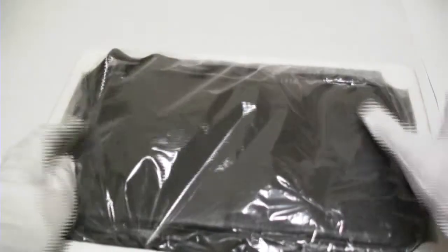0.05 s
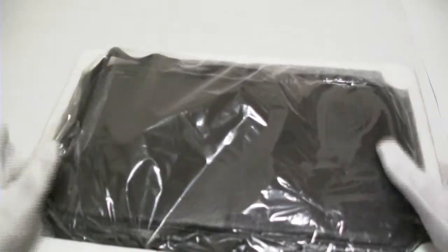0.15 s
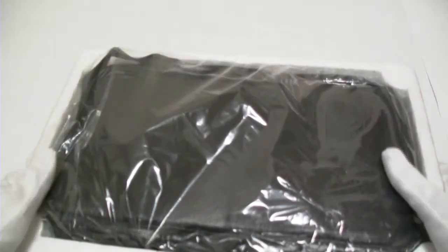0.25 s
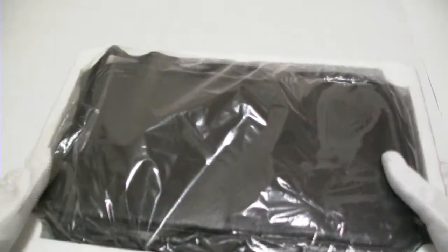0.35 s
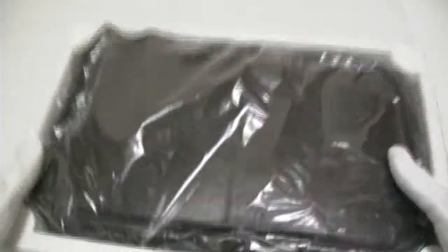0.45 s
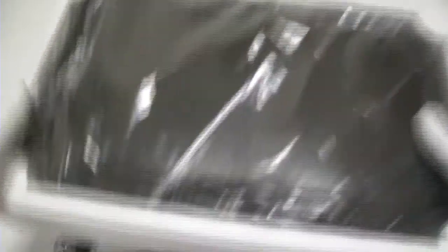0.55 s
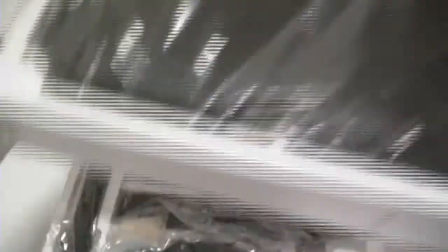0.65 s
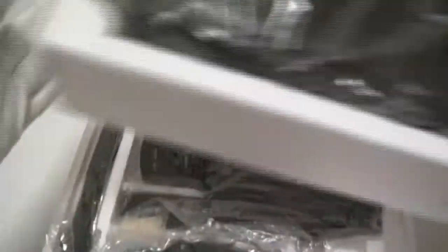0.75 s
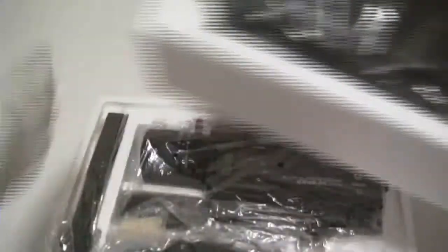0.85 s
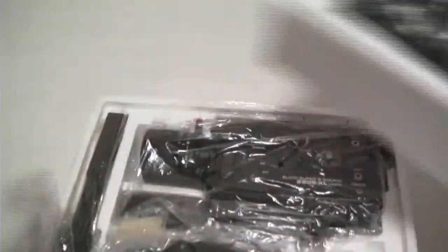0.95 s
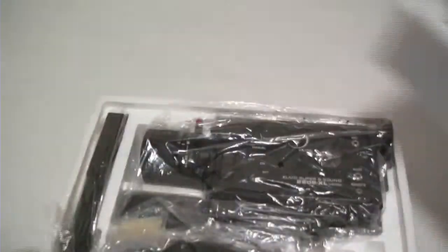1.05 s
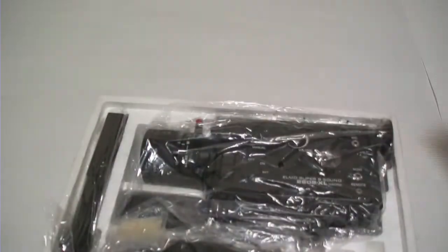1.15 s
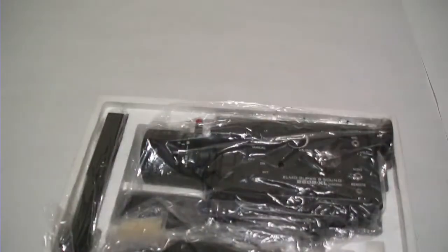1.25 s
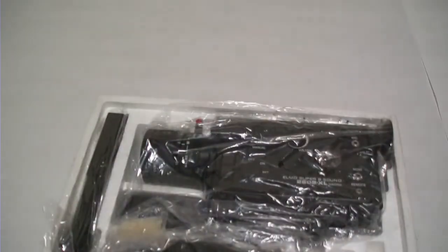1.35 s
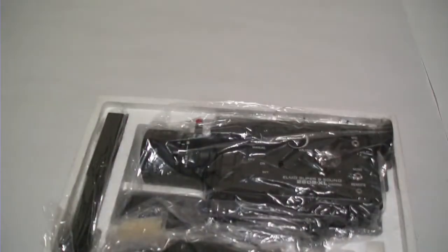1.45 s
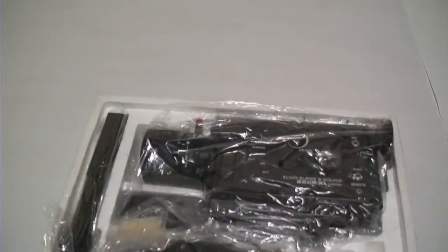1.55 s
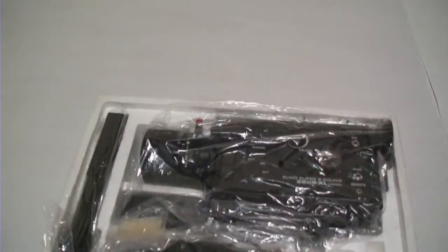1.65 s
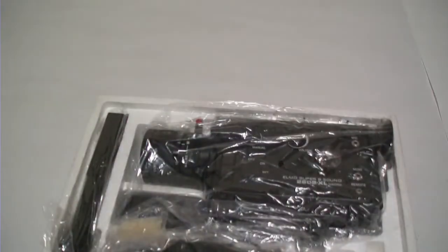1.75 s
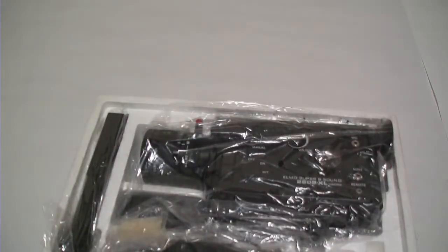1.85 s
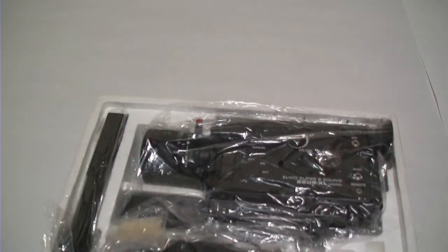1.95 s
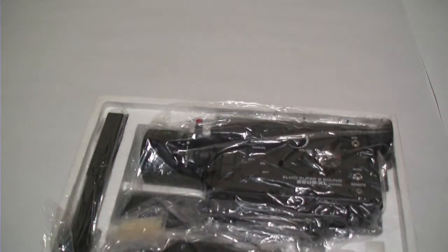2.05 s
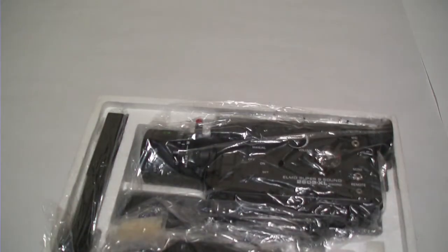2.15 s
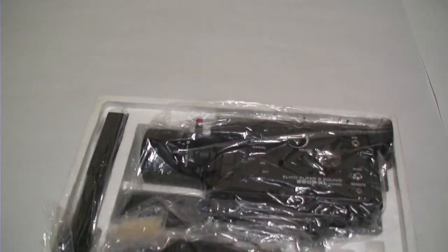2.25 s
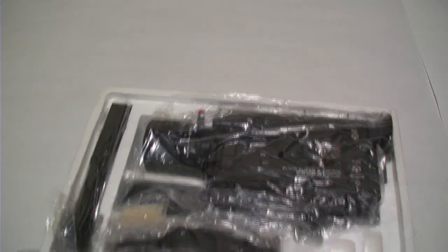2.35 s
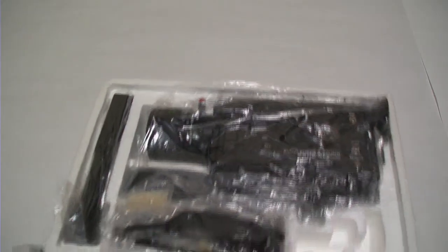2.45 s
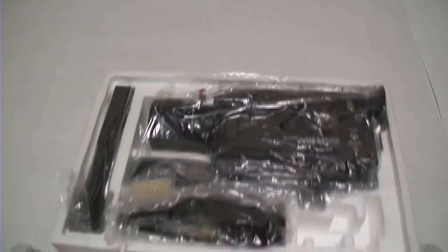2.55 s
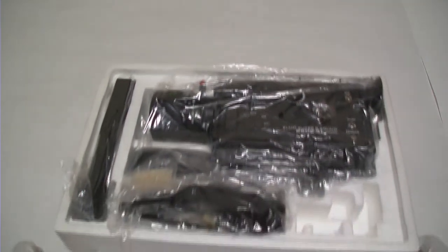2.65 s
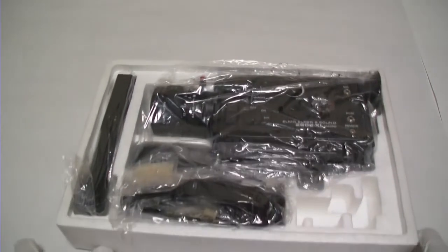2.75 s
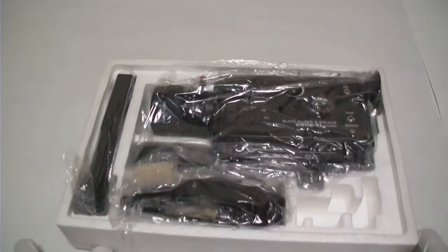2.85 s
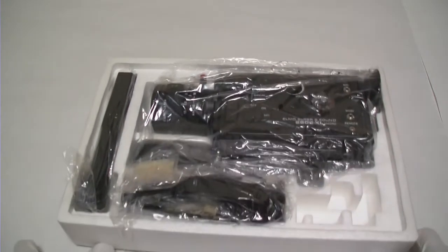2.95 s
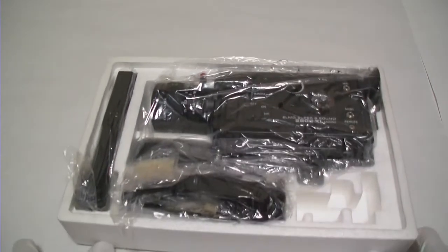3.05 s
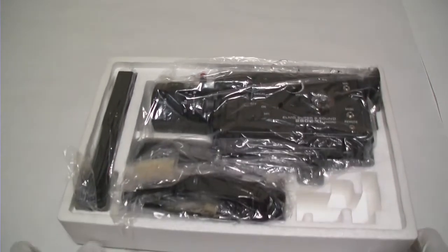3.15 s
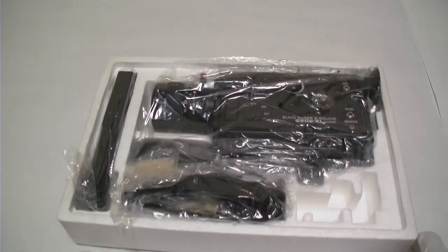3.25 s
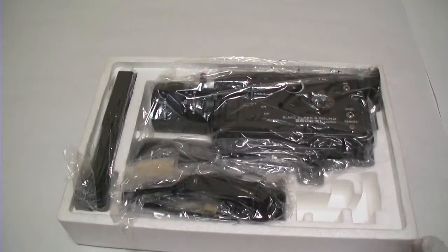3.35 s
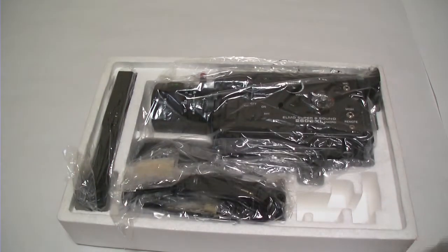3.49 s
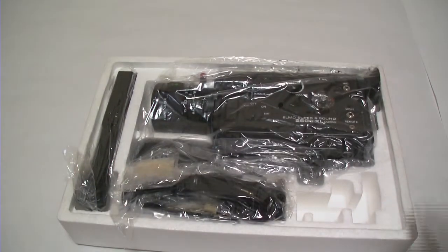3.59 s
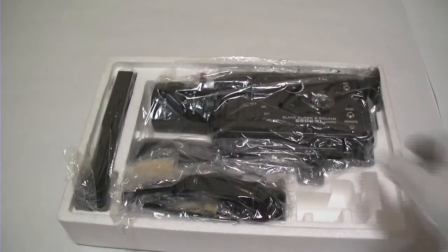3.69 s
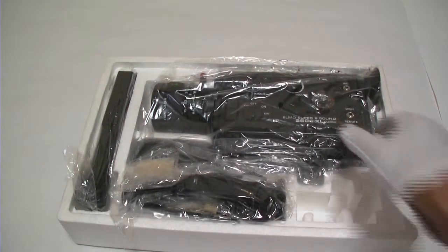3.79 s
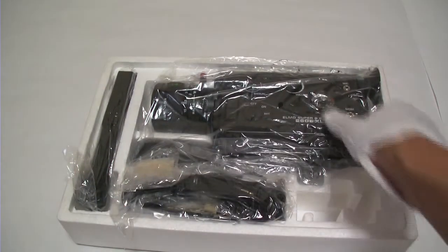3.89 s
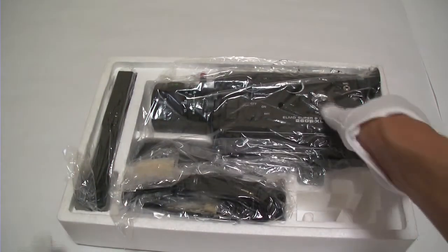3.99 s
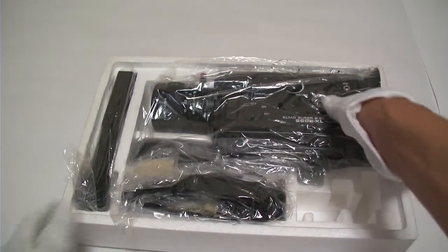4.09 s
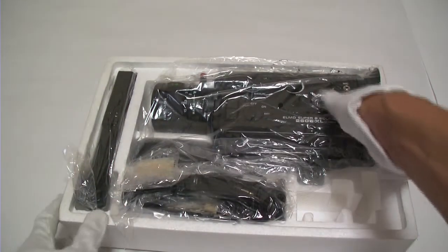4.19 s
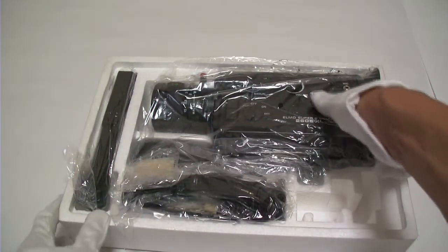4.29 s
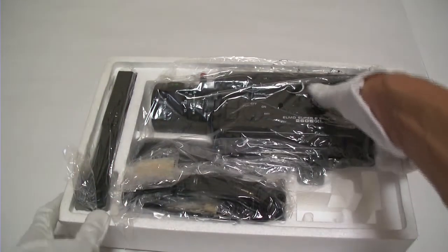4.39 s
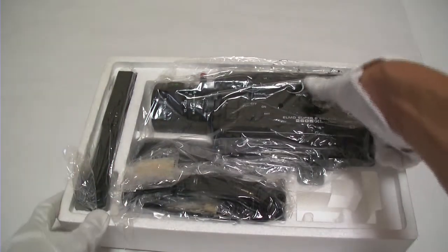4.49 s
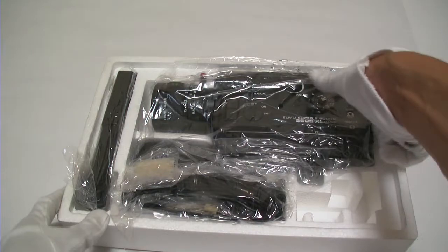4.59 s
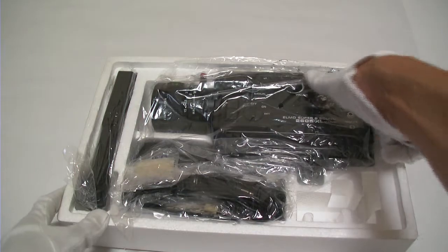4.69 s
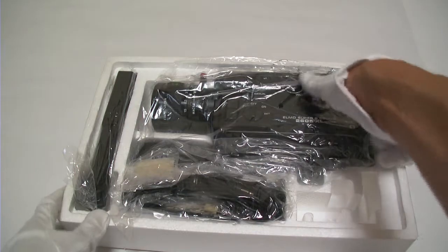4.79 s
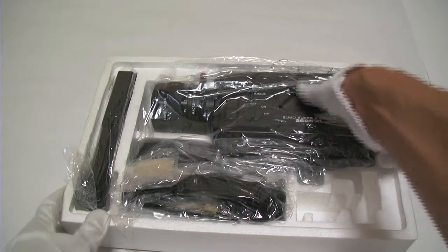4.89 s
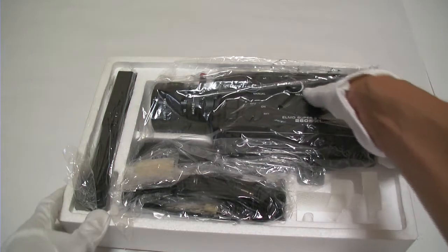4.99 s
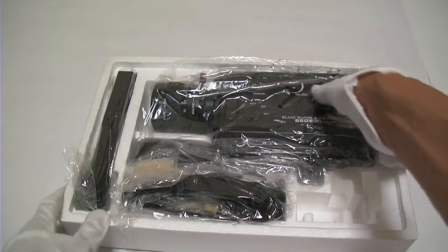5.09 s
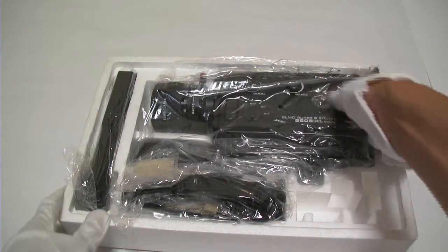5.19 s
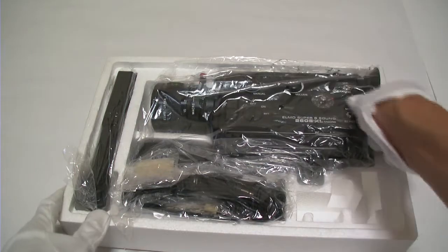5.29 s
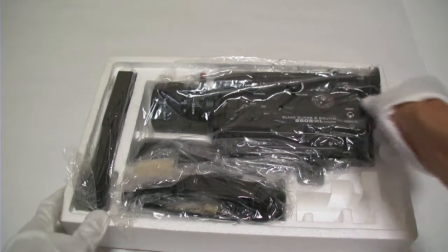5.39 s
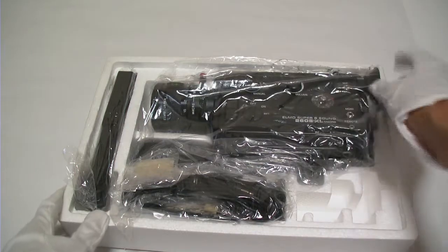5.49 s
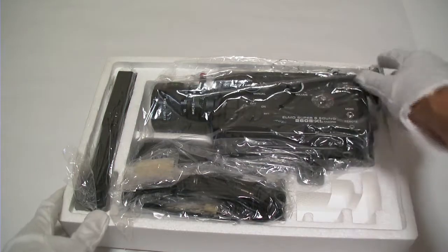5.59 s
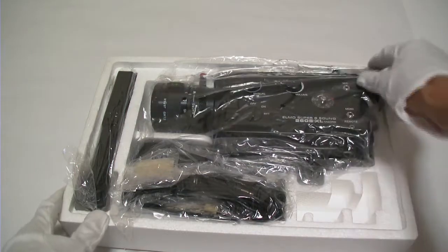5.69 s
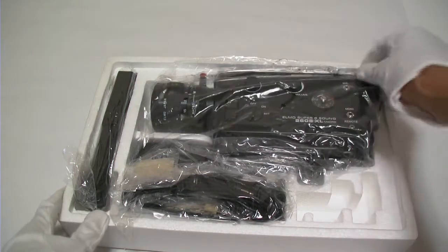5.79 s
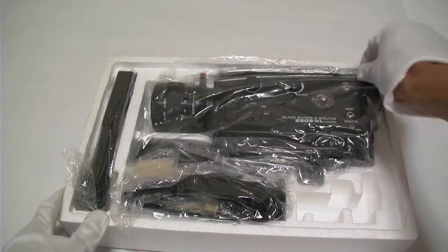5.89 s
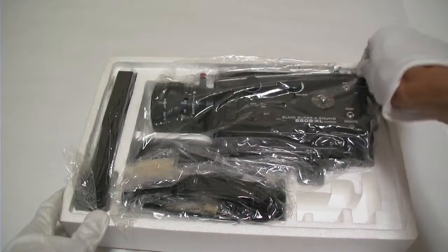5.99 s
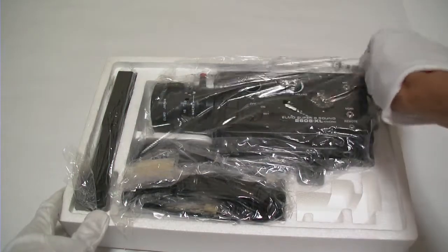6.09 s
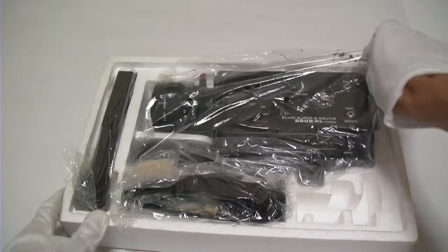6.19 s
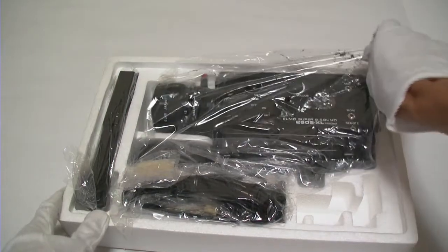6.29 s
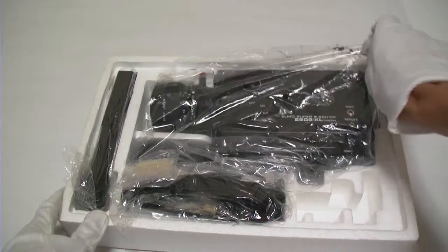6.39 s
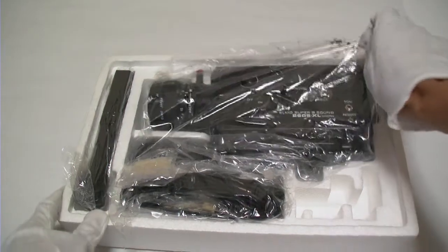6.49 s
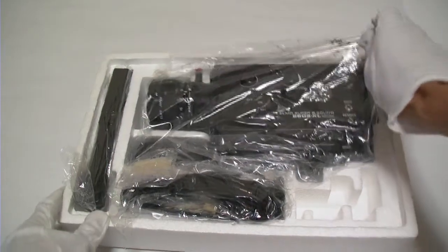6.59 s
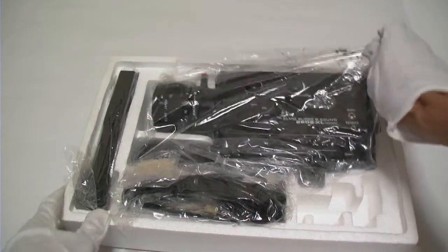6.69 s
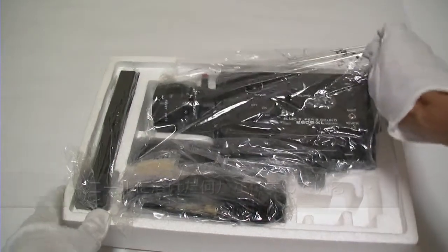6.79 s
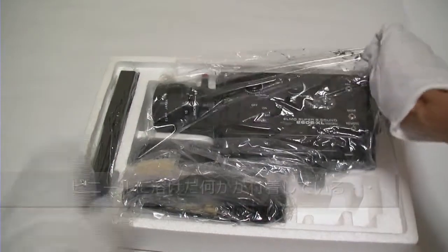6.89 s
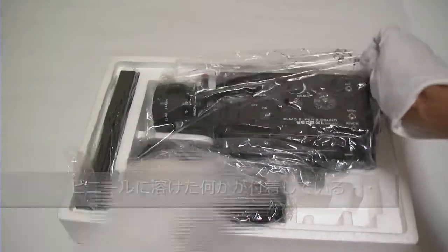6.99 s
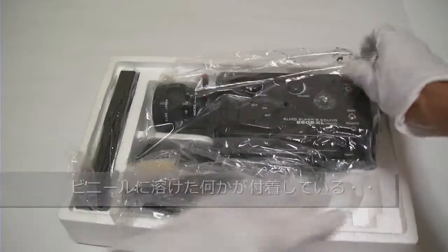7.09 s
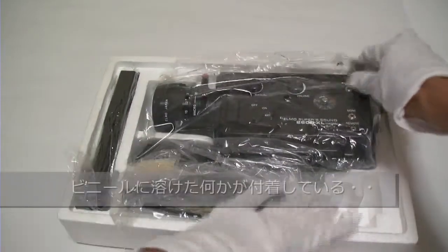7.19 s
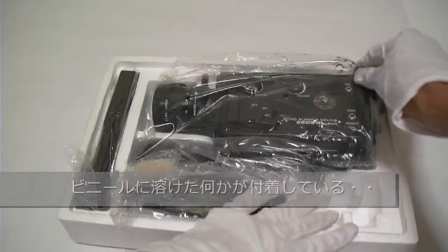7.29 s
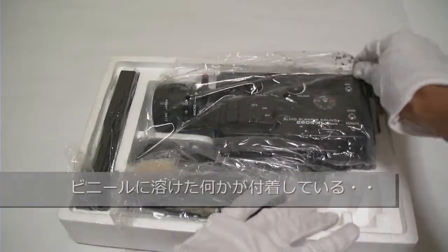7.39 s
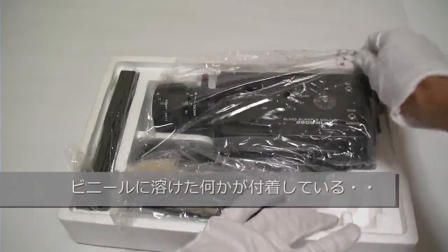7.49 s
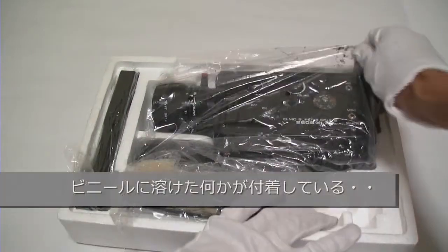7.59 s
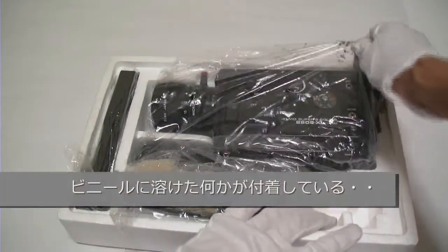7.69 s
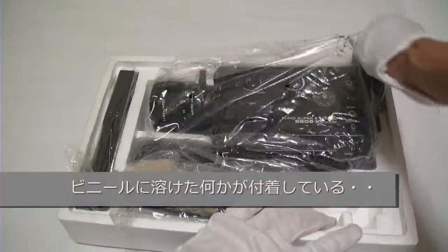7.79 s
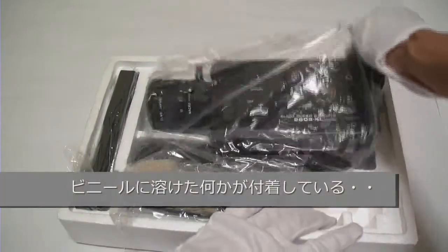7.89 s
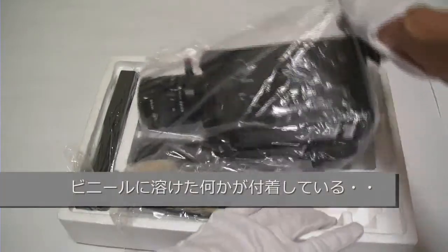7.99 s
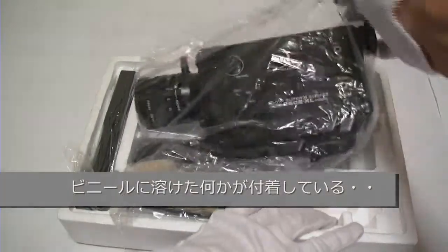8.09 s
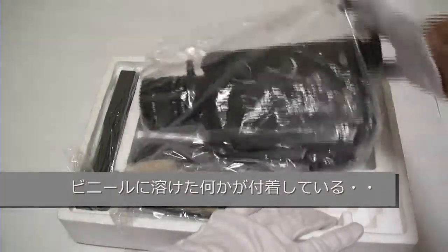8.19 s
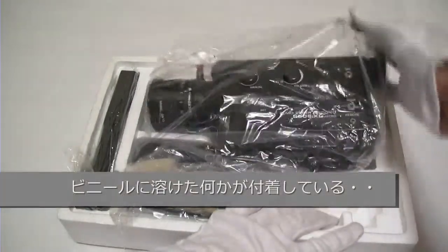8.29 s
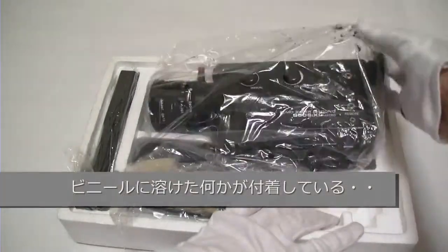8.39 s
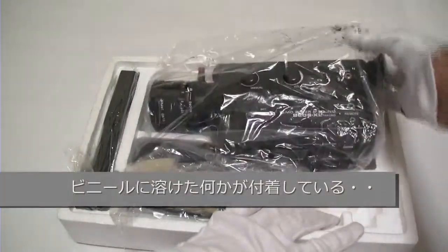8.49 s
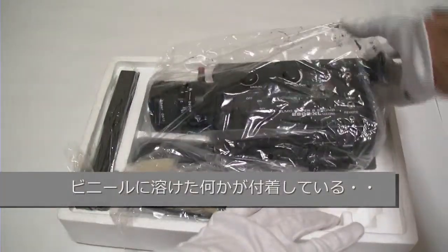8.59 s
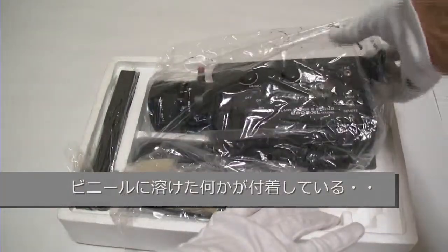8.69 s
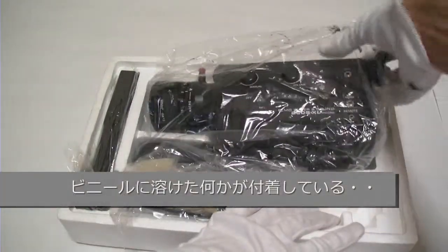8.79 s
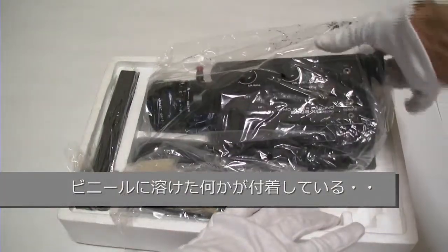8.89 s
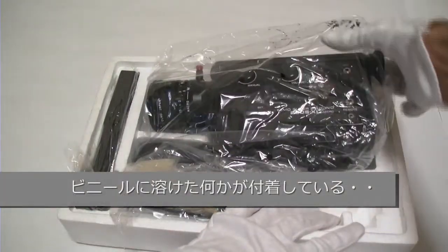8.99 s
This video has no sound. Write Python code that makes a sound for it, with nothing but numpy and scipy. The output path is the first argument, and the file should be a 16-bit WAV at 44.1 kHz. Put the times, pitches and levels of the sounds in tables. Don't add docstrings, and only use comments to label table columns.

```python
import sys
import numpy as np
from scipy import signal
from scipy.fft import rfft, irfft, next_fast_len
from scipy.io import wavfile
from scipy.ndimage import uniform_filter1d, map_coordinates

SR = 44100
rng = np.random.default_rng(int(sys.argv[2]) if len(sys.argv) > 2 else 0)


def put_to_file(sound):
    columns = np.atleast_2d(sound).T
    safe = np.clip(columns, -1, 1)
    whole_steps = np.round(safe * 32767)
    wavfile.write(sys.argv[1], SR, whole_steps.astype(np.int16))


def gain_from_decibels(decibels):
    exponent = np.asarray(decibels, float) / 20
    return 10 ** exponent


N = 399105


def unit(x):
    return x / np.sqrt(np.mean(x ** 2) + 1e-20)


def along(points, hz):
    f, v = np.transpose(points)
    return np.interp(np.log(hz + 1), np.log(f + 1), v)


def curves(rows):
    s, *cols = np.transpose(rows)
    return [np.interp(np.arange(N) / SR, s, c) for c in cols]


def wobble(rate_hz):
    return map_coordinates(rng.standard_normal(int(N * rate_hz / SR) + 4), [np.arange(N) * rate_hz / SR])


def filtered(x, response):
    m = next_fast_len(N + SR // 2)
    return irfft(rfft(x, m) * response(np.fft.rfftfreq(m, 1 / SR)), m)[..., :N]


def placed(seconds, rows):
    at = np.round(np.asarray(seconds) * SR).astype(int)[:, None] + np.arange(rows.shape[1])
    return np.bincount(at.ravel(), rows.ravel(), N + SR)[:N]


def patches(shape, across, along_time):
    field = uniform_filter1d(rng.standard_normal(shape), across, 0)
    return unit(uniform_filter1d(field, along_time, 1))


def resonances(f, modes):
    total = 0
    for k, (centre_hz, width_hz, db) in enumerate(modes):
        damping = 1j * f * width_hz
        total = total + (-1) ** k * gain_from_decibels(db) * damping / (centre_hz * centre_hz - f * f + damping)
    return total


def rustle():
    # t/s, share [0-1]
    crackle_share = [(0, .3), (.62, .25), (.67, .05), (1.5, .1), (2.45, .02), (4.75, .08), (4.8, .3),
                     (5.33, .3), (5.4, .12), (6, .15), (6.1, .7), (6.7, .85), (6.78, .1), (6.97, .1),
                     (7.03, .8), (9.05, .7)]
    # f/Hz, density/dB
    rub_colour = [(400, -34.5), (800, 0), (950, -4), (1250, -1.5), (1650, 2.5), (2900, -2.5), (5900, -1.5),
                  (7500, -2), (9000, -2), (13500, -5.5), (16000, -9)]
    share = np.clip(curves(crackle_share)[0], 0, 1)
    rough = rng.standard_normal(N) * gain_from_decibels(0.92 * wobble(60))
    rub = unit(filtered(rough, lambda hz: gain_from_decibels(along(rub_colour, hz))))
    mix = np.sqrt(share) * crackle() + np.sqrt(1 - share) * rub
    hz, t, z = signal.stft(mix, SR, nperseg=256)
    level_db, bright_db, body_db, fold_hz = handling(t)

    def octaves(centre_hz):
        return np.log2((hz[:, None] + 1) / centre_hz)

    gain_db = (bright_db + 2.5) / (1 + 2 ** (-6 * octaves(7100)))
    gain_db += (body_db + 5.5) / (1 + 2 ** (6 * octaves(2720)))
    gain_db += 2.8 * np.exp(-(octaves(fold_hz) / .2) ** 2)
    gain_db += 2.2 * patches(z.shape, across=2, along_time=16)
    sound = signal.istft(z * gain_from_decibels(gain_db), SR, nperseg=256)[1][:N]
    return gain_from_decibels(np.interp(np.arange(N) / SR, t, level_db)) * unit(sound)


def handling(t):
    # peak t/s, fade/s, level/dB, brightness/dB, foam body/dB
    tray_strokes = [(0, 0.17, -43, -2, -4), (0.062, 0.079, -39, -8, -6), (.21, 0.12, -40, -2, 2),
                    (.28, 0.18, -40, 0, -11.5), (.46, 0.12, -42, -3, -5), (.61, 0.35, -38.5, -6.5, -5.5),
                    (.67, 0.13, -38, 5.5, -8), (0.774, 0.15, -29, -1.5, -16), (.812, 0.063, -29, -6, -10),
                    (.87, 0.087, -47, -13, 8), (1.06, 0.19, -51.5, 2, -9), (1.193, 0.12, -45.5, 4, -2),
                    (1.541, 0.031, -33.5, 9.5, -20), (1.6, 0.35, -48, -4, -8), (1.671, 0.096, -35, -7, -11),
                    (1.78, 0.095, -37, -2, -11), (1.83, 0.11, -35, -12, -2.5), (2.006, 0.055, -44, 2.5, -8),
                    (2.251, 0.1, -41.5, 4.5, -6.5), (3.256, 0.049, -46, -2, 0),
                    (1.33, 0.051, -48.5, -4, -24), (3.42, 0.11, -59.5, 6, -16), (3.6, .05, -56.5, 2, -16)]
    grip_strokes = [(3.935, 0.033, -34.5, 0, -13), (4.0, 0.092, -39, 0.5, -22), (4.12, 0.083, -38, -6, -20),
                    (4.21, 0.043, -36.5, -8, -16), (4.343, 0.046, -30, -3, -13), (4.4, 0.1, -40, -6, -10),
                    (4.7, 0.15, -44, -5, -4), (4.62, 0.17, -43.5, -11, -6), (5.43, 0.14, -38.5, -2.5, -17),
                    (5.62, 0.051, -37.5, 0.5, -14), (5.916, 0.08, -31.5, -6.5, -7.5),
                    (6.78, 0.084, -45, -4, -6), (6.823, 0.056, -38.5, -5, -8), (6.937, 0.049, -41, -1, -9)]
    # peak t/s, fade/s, level/dB
    tug_rows = [(6.15, 0.084, -41), (6.24, 0.2, -38.5), (6.315, 0.15, -35), (7.0, 0.031, -43.5),
                (7.33, 0.11, -37.5), (7.42, 0.19, -39.5), (7.5, 0.17, -38.5), (7.58, 0.14, -36.5),
                (7.86, 0.37, -36), (8.0, 0.13, -42), (8.07, 0.22, -31.5), (8.18, 0.076, -34.5),
                (8.319, 0.11, -38.5), (8.43, 0.35, -35), (8.51, 0.077, -42), (8.628, 0.099, -38),
                (8.76, 0.44, -37.5), (8.87, 0.17, -43)]
    # peak t/s, fade/s, level/dB, brightness/dB, foam body/dB
    slips = [
        (1.516, 0.11, -35, 1.5, -9),
        (2.35, 0.086, -46, 7.5, 5),
        (3.877, 0.14, -36, -2.5, -23),
        (4.275, .1, -43, -3, -12),
        (4.302, 0.048, -30, 1.5, -11),
        (4.529, 0.19, -37, -1.5, -8.5),
        (5.787, 0.12, -31.5, -8, -11),
    ]
    # t/s, level/dB
    drag = [
        (2.37, -54),
        (2.41, -34),
        (2.46, -30),
        (2.67, -32),
        (2.85, -33.5),
        (2.98, -57.5),
        (3.02, -40),
        (3.12, -38.5),
        (3.2, -52),
        (3.24, -69),
    ]
    # t/s, level/dB
    tension = [(1.0, -56), (1.44, -56.5), (2.1, -56.5), (3.3, -56), (3.85, -64), (3.9, -44), (4.86, -56.5),
               (4.92, -53), (5.22, -56), (5.7, -49.5), (6.1, -50), (6.65, -48.5), (6.72, -57),
               (6.89, -54.5), (7.05, -47.5), (7.25, -51.5), (7.6, -45), (9.05, -51)]
    # t/s, f/Hz
    fold = [(0, 6470), (.7, 10000), (.78, 5230), (1.5, 7240), (2.4, 5500), (4.0, 6100), (5.6, 5350),
            (8.3, 5000), (9.05, 3980)]
    tugs = [(*row, -5 - 0.7 * (row[0] - tug_rows[0][0]), -1.5) for row in tug_rows]
    s, fade_s, db, bright_db, body_db = np.transpose(tray_strokes + grip_strokes + tugs + slips)
    fade_s = np.maximum(fade_s, .01)
    is_swell = np.arange(len(s)) < len(s) - len(slips)
    rise_s = np.where(is_swell, 0.65 * fade_s, 0.017)
    late = t - s[:, None]
    fall_db, roundness = 22.5, 1.24
    strokes_db = db[:, None] - fall_db * np.maximum(late / fade_s[:, None], -late / rise_s[:, None]) ** roundness
    drag_db = np.interp(t, *np.transpose(drag), left=-120, right=-120)
    tension_db = np.interp(t, *np.transpose(tension))
    power = gain_from_decibels(2 * np.vstack([strokes_db, drag_db, tension_db]))
    total = power.sum(axis=0)
    bright = np.append(bright_db, [-1.5, -6.5]) @ power / total
    body = np.append(body_db, [-6.5, -3]) @ power / total
    return 10 * np.log10(total), bright, body, np.interp(t, *np.transpose(fold))


def crackle():
    # f/Hz, density/dB
    film_colour = [(500, -30), (900, 5), (1800, -3), (2900, -12.5), (4900, -4.5), (7400, -5.5), (10600, 1),
                   (16000, 1.5)]
    draw = rng.random((4200, 4))
    seconds = draw[:, 0] * N / SR
    clump_db = 2 * wobble(40)[(seconds * SR).astype(int)]
    size = gain_from_decibels(np.minimum(-5 * np.log(draw[:, 1]), 8.5) + clump_db)
    rows = buckles(2500 * 3.8 ** draw[:, 2], np.full(len(draw), -10.), .0015 + .002 * draw[:, 3], width=.6)
    film = filtered(placed(seconds, rows * size[:, None]), lambda hz: gain_from_decibels(along(film_colour, hz)))
    return film / np.sqrt(np.abs(uniform_filter1d(film ** 2, size=SR // 16)) + 1e-9)


def buckles(hz, top_db, t60_s, width):
    t, f = np.arange(384) / SR, np.fft.rfftfreq(384, 1 / SR) + 1
    late = np.maximum(t - .001, 0)
    envelope = gain_from_decibels(-60 * late / t60_s[:, None]) * (1 - np.exp(-late / .00012))
    burst = rng.standard_normal((len(hz), 384)) * envelope
    bump = np.exp(-(np.log(f / hz[:, None]) / width) ** 2)
    skirt = gain_from_decibels(top_db)[:, None] / (1 + (2500 / f) ** 4) / (1 + (f / 13000) ** 2)
    rows = irfft(rfft(burst) * (bump + skirt), 384)
    return rows / np.abs(rows).max(axis=1, keepdims=True)


def snaps():
    # t/s, peak level/dB, centre f/Hz, skirt level/dB
    snap_rows = [(0.0414, -18, 8400.0, 12), (0.1208, -24.5, 5300.0, -10), (0.2049, -17, 8100.0, -5),
                 (0.225, -17.5, 8300.0, -2), (0.2703, -18, 10300.0, -6), (0.56, -17.5, 3230, -17),
                 (0.577, -18, 7200.0, -1), (0.6126, -11.5, 5700.0, 7), (0.8843, -16.5, 10400, 19),
                 (1.0063, -28.5, 8300, -2), (1.819, -18, 3300, -18), (2.1394, -22.5, 5500, -16),
                 (2.993, -30, 5000, -11),
                 (4.058, -20, 6400, -13), (4.0659, -17, 8400, -6), (4.24, -22.5, 8300, 1),
                  (4.3053, -20, 4200, -14), (4.443, -25, 6300, 8), (4.895, -23, 11900, -2),
                  (4.921, -24, 8750, -3), (4.951, -28.5, 5500.0, -21), (5.053, -26, 14100.0, -5),
                  (5.1169, -28, 10100, -12), (5.266, -28.5, 9000.0, -5), (5.311, -26.5, 10300.0, -7),
                  (5.3483, -29, 14900, -17), (5.476, -18.5, 4550, 5), (5.4953, -18.5, 10800, -13),
                  (5.7813, -20.5, 10500, -18), (5.898, -19, 4180, -21),
                 (6.1081, -27, 6000.0, -14), (6.143, -18.5, 4500.0, -10), (6.201, -14.5, 11400.0, 4),
                     (6.2246, -24, 6400.0, -8.0), (6.26, -16.5, 11000.0, -7), (6.277, -18, 5500.0, -6),
                     (6.4419, -18.5, 4300.0, -5), (6.526, -30, 2690, -31), (6.6275, -26.5, 10500.0, 7),
                     (6.664, -24, 11700.0, 19), (7.0227, -26.5, 4800.0, -18), (7.07, -20, 5740, -16),
                     (7.0986, -18, 4020, -9), (7.1427, -20, 5900.0, 0), (7.181, -20, 6000, -10),
                     (7.271, -29.0, 4800.0, -3), (7.309, -24, 7100.0, 0), (7.3247, -23.5, 5900.0, -11),
                     (7.3436, -20, 11400.0, -5), (7.4673, -20, 5300.0, -15),
                 (7.557, -18, 8000, -20), (7.5682, -15, 6300, -12), (7.5824, -12.5, 5340, -6),
                  (7.621, -17.5, 4700.0, -13.0), (7.636, -16.5, 4100, -25), (7.67, -25.5, 6500.0, -22),
                  (7.831, -18, 5760, 4), (7.8507, -14.5, 3120, -10), (8.022, -14, 6000.0, -2),
                  (8.049, -17, 9900, -3), (8.0918, -20, 4500.0, -25), (8.1228, -24, 7400.0, -11),
                  (8.1544, -11, 5000, -9), (8.1998, -21, 4650, 0), (8.31, -16, 6460, -20),
                  (8.388, -18.5, 4670, -14.0), (8.464, -18, 5030, 15), (8.5043, -16.5, 9350, 5),
                  (8.5173, -21, 4570, -10), (8.648, -18, 3830, -15), (8.663, -19, 9200, -13),
                  (8.7584, -19, 6300, -11.0), (8.818, -19, 6400.0, -9), (8.8522, -8.5, 4200, -15),
                  (8.8927, -16, 4400, -4), (9.008, -16, 4750, -16)]
    # t/s, peak level/dB, centre f/Hz
    pops = [(0.341, -23.5, 1500), (.5965, -31, 2600), (1.825, -28, 770), (5.929, -26, 1530),
            (7.337, -26, 1380), (7.568, -21, 1270), (7.583, -26, 2060), (7.67, -24, 1730),
            (7.851, -22, 1320), (8.083, -23, 1540), (8.153, -26, 2030), (8.754, -29, 920),
            (8.853, -26.5, 1000), (8.946, -27, 1410), (9.006, -25, 1980), (1.527, -28, 580),
            (7.0985, -29, 1420), (.344, -29, 1000)]
    s, db, hz, top_db = np.transpose(snap_rows)
    t60_s = .0042 * gain_from_decibels(.2 * (db + 22))
    direct = placed(s - .001, gain_from_decibels(db - 1.35)[:, None] * buckles(hz, top_db + 8.5, t60_s, width=0.28))
    s, db, hz = np.transpose(pops)
    direct += placed(s - .001, gain_from_decibels(db - 0.4)[:, None] * buckles(hz, db * 0 - 28.0, 14 / hz, width=0.61))
    direct += ticks()
    first_echo = gain_from_decibels(-13.0) * np.roll(direct, round(.0023 * SR))
    second_echo = gain_from_decibels(-11) * np.roll(direct, round(.0041 * SR))
    return direct + first_echo + second_echo


def ticks():
    # t/s, peak level/dB, centre f/Hz
    tick_rows = [(0.0169, -25, 6400), (0.0315, -26, 6400), (0.0557, -24, 8700), (0.0656, -21, 7300),
                 (0.0815, -29, 7000), (0.1711, -24, 8000), (0.24, -15, 8600), (0.339, -19, 6800),
                 (0.975, -41, 5200), (1.149, -31, 7100), (1.1613, -42, 5000), (1.4693, -33, 5300),
                 (2.1024, -40, 8200), (2.9698, -39, 5900), (3.1924, -34, 4800), (4.0703, -27, 7400),
                 (4.1274, -21, 6000), (4.1423, -25, 7100), (4.1632, -35, 6200), (4.4774, -38, 5000),
                 (4.8148, -33, 6600), (4.8371, -35, 6900), (4.9606, -35, 5500), (5.0164, -33, 5800),
                 (5.032, -24.5, 7600), (5.062, -27, 7000), (5.0751, -32, 8800), (5.3174, -30, 7200),
                 (5.3602, -37, 5600), (5.4267, -22, 8400), (5.5195, -21, 8300), (5.575, -33, 5400),
                 (5.59, -38, 3970), (5.8262, -21, 9400), (5.8768, -23, 6300), (6.0102, -30, 5100),
                 (6.0394, -27, 5200), (6.0951, -41, 4400), (6.1141, -30, 8500), (6.1322, -24, 4900),
                 (6.1574, -26, 6300), (6.1693, -26, 6400), (6.18, -22, 6700), (6.187, -18, 5100),
                 (6.2071, -22, 5300), (6.2146, -22, 5100), (6.2368, -27, 7700), (6.2409, -19, 6400),
                 (6.2699, -20, 9000), (6.2818, -22, 7900), (6.2879, -23, 7300), (6.294, -19, 6600),
                 (6.3027, -18, 5800), (6.321, -23, 7900), (6.3305, -25, 5900),
                 (6.3629, -31, 7200), (6.3985, -24, 7800), (6.4246, -34, 6800), (6.4712, -34, 3900),
                     (6.4794, -37, 4600), (6.4913, -35, 4900), (6.4975, -34, 5900), (6.5033, -33, 5300),
                     (6.5121, -35, 4900), (6.5727, -31, 4000), (6.5774, -32, 5400), (6.591, -32, 7300),
                     (6.5969, -30, 4600), (6.6073, -33, 5400), (6.6127, -35, 4400), (6.6799, -33, 5600),
                     (6.687, -35, 4600), (6.6994, -26, 5900), (6.7511, -36, 6400), (6.9739, -39, 3500),
                     (6.9849, -37, 3800), (7.0397, -34, 5900), (7.0485, -35, 6400), (7.0846, -30, 4700),
                     (7.1024, -29, 4500), (7.1181, -32, 6100), (7.1223, -33, 3900), (7.1513, -29, 5200),
                     (7.1848, -32, 6000), (7.1966, -35, 7300), (7.2192, -30, 6800), (7.2867, -25, 7400),
                     (7.2933, -32, 4100), (7.3307, -22, 8200), (7.3621, -23, 7100), (7.3658, -31, 6500),
                     (7.3885, -31, 4900), (7.4076, -25, 5400), (7.4317, -27, 5300), (7.441, -33, 6500),
                     (7.4511, -27, 7200), (7.5376, -23, 7900), (7.5406, -28, 5200), (7.5963, -21, 7800),
                     (7.6402, -21, 5100), (7.7052, -27, 9300), (7.7125, -25, 7400), (7.7467, -29, 5800),
                 (7.7607, -23, 7100), (7.8221, -18, 6200), (7.9211, -31, 5300), (7.9302, -25, 4500),
                  (7.9713, -24, 5600), (7.979, -20, 6200), (7.9926, -20, 7500), (8.0065, -22, 6000),
                  (8.0294, -16, 8000), (8.059, -19, 5200), (8.069, -20, 7200), (8.1088, -23, 5800),
                  (8.1482, -21, 4370), (8.1588, -21, 5500), (8.2255, -29, 5300), (8.2871, -30, 5600),
                  (8.2938, -30, 5000), (8.3268, -20, 6800), (8.3438, -25, 6900), (8.3553, -20, 8500),
                  (8.3925, -23, 6800), (8.397, -20, 5500), (8.4178, -27, 5600), (8.433, -28, 8100),
                  (8.509, -13.5, 6900), (8.5136, -22, 7400), (8.5571, -30, 5500), (8.5883, -25, 5400),
                  (8.6119, -22, 5200), (8.6266, -30, 4600), (8.6419, -24, 5100), (8.6753, -24, 7550),
                  (8.6912, -18, 9000), (8.7069, -33, 8200), (8.7131, -20, 5470), (8.7334, -23, 5400),
                  (8.7442, -24, 5500), (8.7939, -26, 5300), (8.856, -21, 4900), (8.8684, -27, 7000),
                  (8.9116, -29, 5500), (8.9464, -25, 3100), (8.9561, -24, 5100), (8.9651, -26, 5000),
                  (8.9695, -28, 5400), (8.9762, -26, 4400), (9.0238, -28, 5100)]
    s, db, hz = np.transpose(tick_rows)
    return placed(s - .001, gain_from_decibels(db - 3.0)[:, None] * buckles(hz, db * 0 - 14.0, db * 0 + 0.0027, width=0.57))


def rip():
    # f/Hz, width/Hz, level/dB
    rip_modes = [(1850, 240, -5.5), (2770, 250, -8.5), (4130, 250, 0.5), (5350, 250, -8), (6400, 250, -6),
                 (8300, 380, -3)]
    start_s, hold_s, t60_s, level_db = 4.2945, 0.01, 0.046, -24
    late = np.arange(N) / SR - start_s
    grip = np.clip(late / 0.0018, 0, 1) * gain_from_decibels(-60 * np.maximum(late - hold_s, 0) / t60_s)
    friction = rng.standard_normal(N) * gain_from_decibels(2.3 * wobble(399.8))
    bands = filtered(friction, lambda f: resonances(f, rip_modes))
    return gain_from_decibels(level_db) * grip * unit(bands)


def squeak():
    # t/s, level/dB, f/Hz
    squeak_path = [
        (2.4, -95, 962),
        (2.45, -51, 964),
        (2.56, -44, 948),
        (2.63, -43, 902),
        (2.75, -84, 870),
    ]
    db, hz = curves(squeak_path)
    phase = 2 * np.pi * np.cumsum(hz + 12 * wobble(60)) / SR
    return gain_from_decibels(db + 1.73 * wobble(47.0)) * np.sin(phase)


def knocks():
    # t/s, peak level/dB, t60/s, centre f/Hz, width/Hz
    contacts = [
        (.34, -30.5, 0.054, 800, 500),
        (.362, -30.5, 0.26, 736, 120),
        (1.52, -28.5, 0.25, 520, 200),
        (1.819, -34.5, 0.16, 600, 900),
    ]
    # f/Hz, width/Hz, level/dB
    tray_modes = [(197, 115, 6), (467, 170, 0), (550, 28, -4), (694, 100, 0.5), (870, 120, -5.5),
                  (1450, 66, 0), (1920, 390, -1.5)]
    t, blows = np.arange(SR // 5) / SR, np.zeros(N)
    for s, db, t60_s, centre_hz, width_hz in contacts:
        envelope = gain_from_decibels(-60 * t / t60_s) + 3 * gain_from_decibels(-60 * t / .025)
        push = gain_from_decibels(db + 6) * envelope * rng.standard_normal(len(t))
        band = signal.lfilter(*signal.iirpeak(centre_hz, centre_hz / width_hz, SR), push)
        blows += placed([s], (band + 0.21 * push)[None])
    return filtered(blows, lambda f: (1j * f / (120 + 1j * f)) ** 4 * resonances(f, tray_modes))


def thump():
    start_s, level_db, end_hz, t60_s, sag = 1.5122, -24.5, 510, 0.048, .7
    t = np.arange(SR // 10) / SR
    hz = end_hz * (1 + sag * np.exp(-t / 0.0037))
    tone = -np.sin(2 * np.pi * np.cumsum(hz) / SR)
    return placed([start_s], gain_from_decibels(level_db - 60 * t / t60_s)[None] * tone)


def fan():
    # multiple of shaft rate, rms level/dB, change while trays shade the fan/dB
    blades = [(1, -67.5, -0.5), (3, -61, 4.5), (4, -54.5, -4.5), (5, -64.5, 1), (7, -65.5, -2)]
    # f/Hz, rms level/dB
    motor = [(286.9, -63.5)]
    # f/Hz, density/dB
    air_colour = [(30, -46), (105, -19), (200, -10), (400, -3.5), (530, -0.5), (900, 1.5), (1250, -2.5),
                  (1550, -1.5), (2000, -5), (2700, -13), (5000, -18.5), (8000, -47), (16000, -68)]
    shaft_hz = 231.6
    turn = 2 * np.pi * np.cumsum(shaft_hz * (1 + 0.001565 * wobble(3))) / SR
    t = np.arange(N) / SR
    shade = np.interp(t, [1.5, 2.9], [1, 0])
    tones = np.zeros(N)
    for k, db, change_db in blades:
        tones += gain_from_decibels(db + change_db * shade + 1.2 * wobble(12)) * np.sin(k * turn)
    for hz, db in motor:
        tones += gain_from_decibels(db + 1.0 * wobble(12)) * np.sin(2 * np.pi * hz * t + 0.66 * wobble(8.8))
    air = unit(filtered(rng.standard_normal(N), lambda hz: gain_from_decibels(along(air_colour, hz))))
    return np.sqrt(2) * tones + gain_from_decibels(-50.5 + 1.8 * wobble(1.65)) * air


def room(x):
    # f/Hz, t60/s
    walls = [(300, 0.5), (4000, 0.38), (15000, 0.054)]
    hz, t, z = signal.stft(rng.standard_normal(SR // 3), SR, nperseg=256)
    tail = signal.istft(z * gain_from_decibels(-60 * t / along(walls, hz)[:, None]), SR, nperseg=256)[1]
    return signal.fftconvolve(np.pad(x, (200, 0)), tail / np.linalg.norm(tail))[:N]


def scene():
    # f/Hz, level/dB
    side_colour = [(60, -15), (150, -37), (380, -27), (950, -23.5), (2380, -29.5), (5980, -31),
                   (15000, -12)]
    contacts = np.array([snaps(), knocks() + thump()])
    clicks, thuds = filtered(contacts, lambda f: 1 / (1 + (150 / (f + 1)) ** 6))
    echoes = room(0.26 * clicks + gain_from_decibels(-11.0) * thuds)
    mid = clicks + thuds + echoes + rustle() + squeak() + fan() + rip()
    other = mid * wobble(200)
    side = filtered(other, lambda hz: gain_from_decibels(along(side_colour, hz)))
    return np.array([mid + side, mid - side])


def top_cut(x):
    return signal.sosfilt(signal.butter(12, 16970, fs=SR, output="sos"), x)


def record(dry):
    limited = filtered(dry, lambda hz: hz < 15850)
    return top_cut(limited)


dry = scene()
out = record(dry)
put_to_file(out)
```